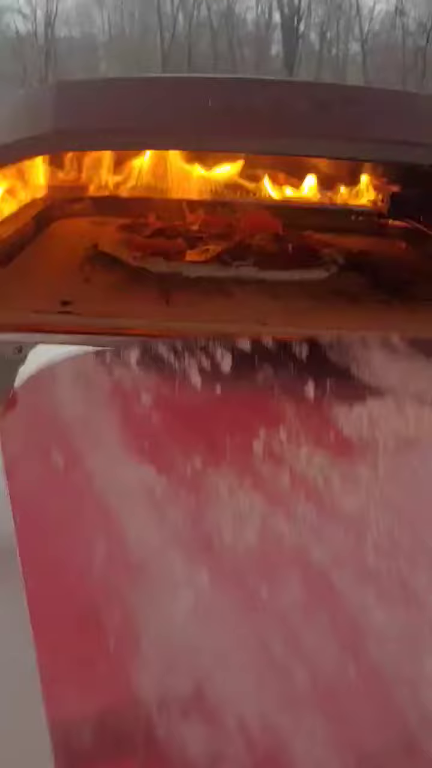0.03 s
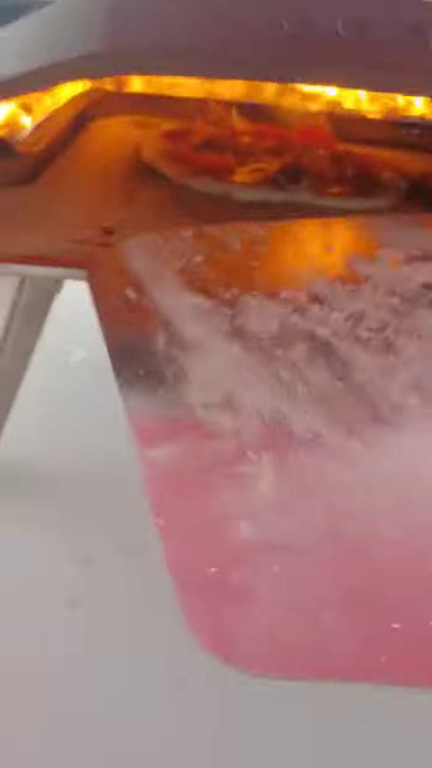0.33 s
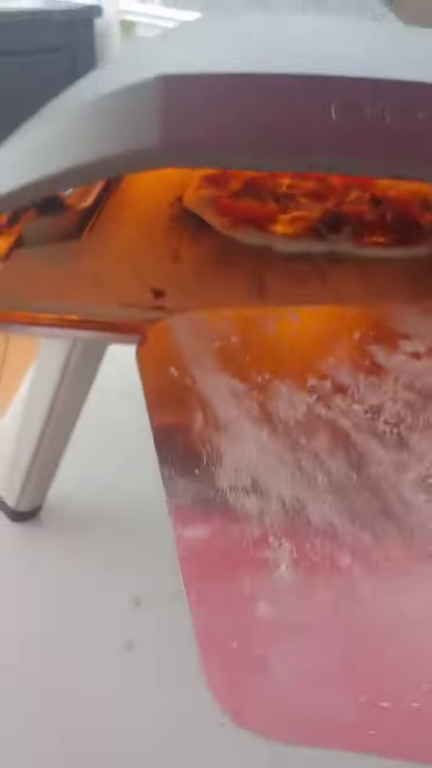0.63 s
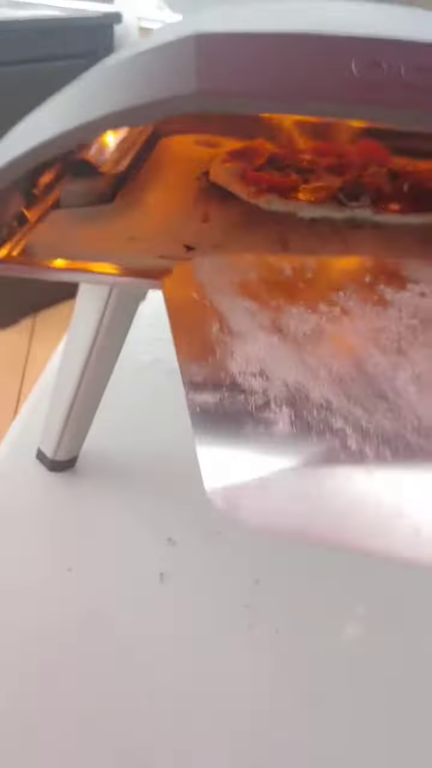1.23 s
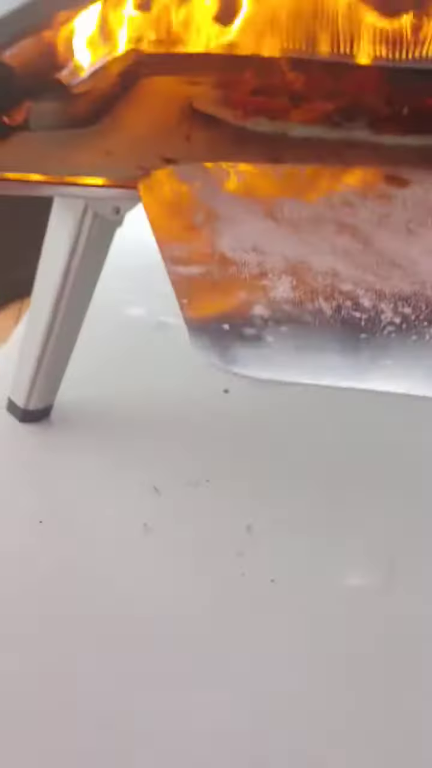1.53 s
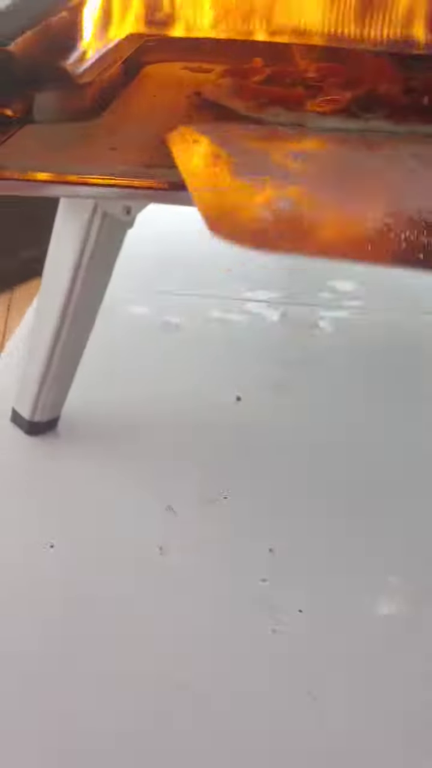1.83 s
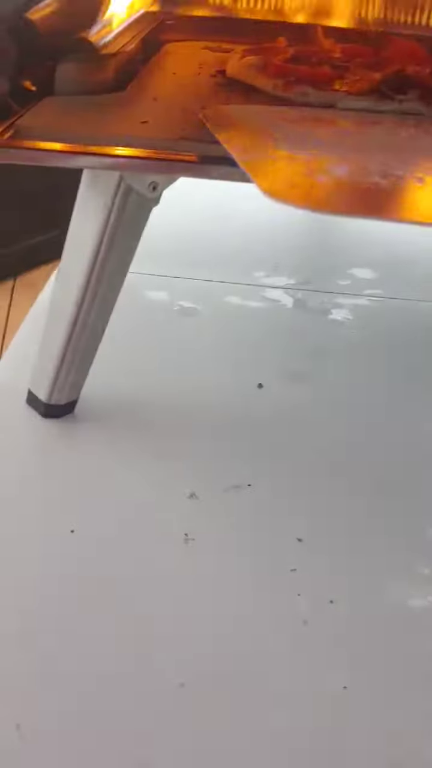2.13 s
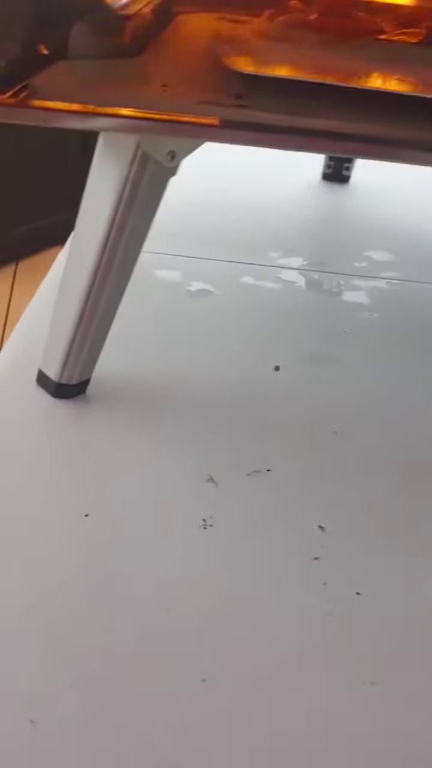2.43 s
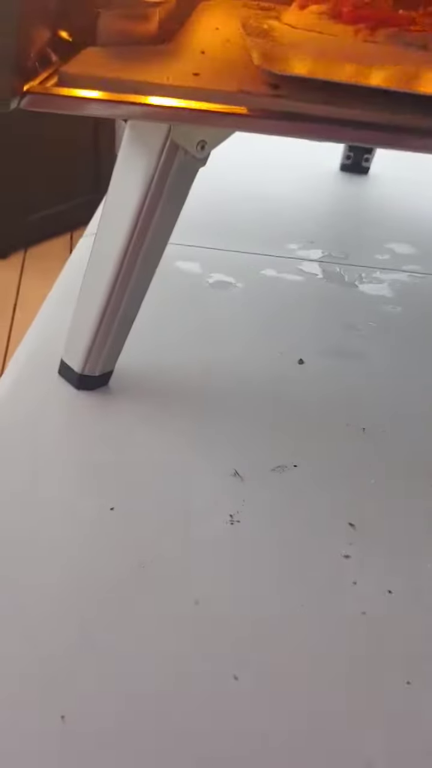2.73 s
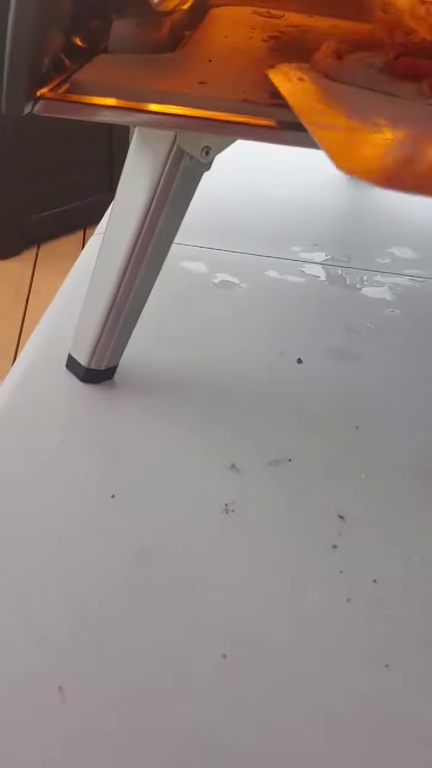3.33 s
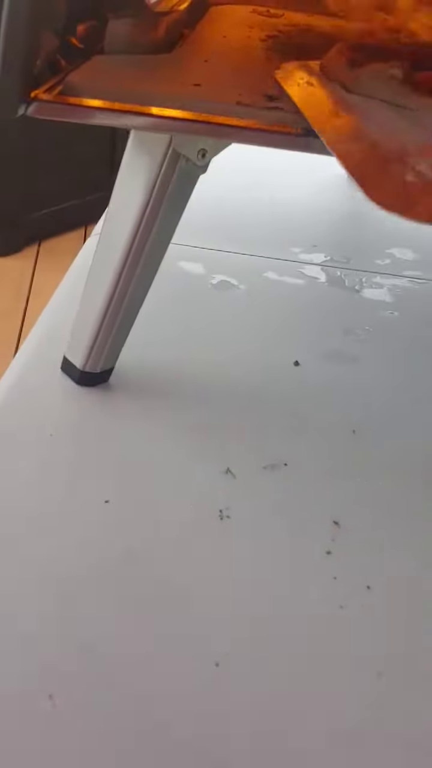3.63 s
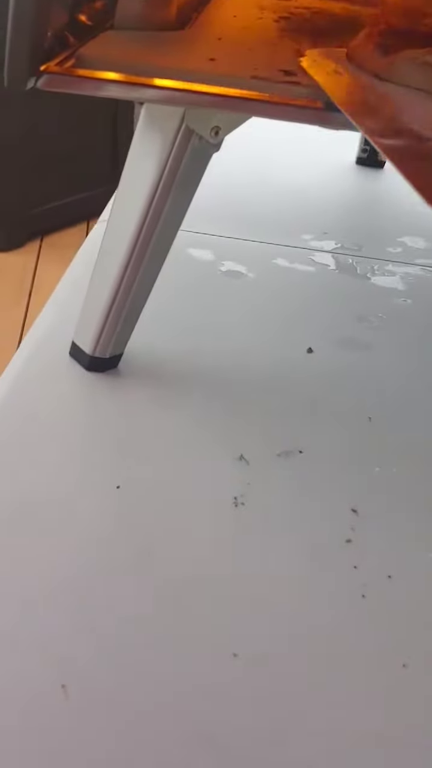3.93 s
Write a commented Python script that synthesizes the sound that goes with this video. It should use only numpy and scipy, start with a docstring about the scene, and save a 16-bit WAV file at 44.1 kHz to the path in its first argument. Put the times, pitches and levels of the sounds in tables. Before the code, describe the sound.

Short, raspy scrapes of a thin metal pizza peel on oven stone follow a ringing knock and a little wind on the nearby microphone. Crumbs snap and the blade rubs hollowly under dough, while the outdoor oven's flame rumbles throughout.

```python
"""A metal peel scrapes over the stone floor of an outdoor gas oven in short, gritty strokes.
Its edge sticks and slips, so the thin blade hisses, rumbles, rings and now and then squeals or honks.
It knocks on the oven mouth, snaps crumbs and drags hollowly under the dough. Underneath, the flame
roars and the oven cavity drones; light gusts touch the two ports of a hand-held microphone."""
import sys
import numpy as np
from scipy import signal
from scipy.fft import rfft, irfft
from scipy.io import wavfile

SR = 44100
rng = np.random.default_rng(int(sys.argv[2]) if len(sys.argv) > 2 else 0)


def int16_out(signal):
    """Quantize to a 16-bit WAV file."""
    q = np.round(np.clip(np.atleast_2d(signal).T, -1, 1) * 32767)
    wavfile.write(sys.argv[1], SR, q.astype(np.int16))


N = 176400
TIME = np.arange(N) / SR

# main modes of the peel's blade: f/Hz, relative level/dB, t60/s
BLADE_MODES = [(215, 1.5, 0.22), (278, -6, 0.18), (688.4, 5, 0.36), (787, -0.5, 0.4), (928, 9.5, 0.43),
               (1145, 1.5, 0.36), (1266, 2.5, 0.23), (1470, 3, 0.43), (1756, 5, 0.26), (1912, -1.5, 0.35),
               (2030, 5.5, 0.35), (2376, 1, 0.16), (2506, 2, 0.19), (3540, -1.5, 0.15), (4190, -9, 0.16),
               (5450, 2, 0.15), (5932, -9, 0.13), (6514, 4, 0.069)]


def amp(db):
    return 10 ** (np.asarray(db) / 20)


def unit_rms(x):
    return x / np.sqrt(np.mean(x ** 2) + 1e-20)


def unit_energy(x):
    return x / np.sqrt(np.sum(x ** 2, axis=-1, keepdims=True))


def at_hz(points, hz):
    """Reads a spectrum on a log-frequency axis."""
    f, value = np.transpose(points)
    return np.interp(np.log(hz + 1), np.log(f + 1), value)


def at_time(points):
    """Reads a curve at every sample."""
    return np.interp(TIME, *np.transpose(points))


def add(mix, start, sound):
    part = mix[:, max(round(start * SR), 0):][:, :sound.shape[-1]]
    part += sound[..., :part.shape[-1]]


def through(x, response):
    return signal.fftconvolve(np.atleast_2d(x), np.atleast_2d(response), axes=1)[:, :N]


def colour(points, size=4096):
    """Causal impulse response with the given spectrum."""
    log_gain = np.log(amp(at_hz(points, abs(np.fft.fftfreq(size, 1 / SR)))))
    return np.fft.ifft(np.exp(np.conj(signal.hilbert(log_gain)))).real[:size // 2]


def shape(x, points):
    """EQ that keeps the power of white noise."""
    return through(x, unit_energy(colour(points)))


def wander(hz):
    """Random drift of rms 1, rolling off above the given rate."""
    rolloff = 1 + (np.fft.rfftfreq(N, 1 / SR) / hz) ** 2
    return unit_rms(irfft(rfft(rng.standard_normal(N)) / rolloff, N))


def flame():
    """The gas flame's fluttering roar, nearly centred in the bass and wide in the treble."""
    spectrum = [(20, -8), (45, 3), (80, 0.5), (130, -2), (200, -4), (255, -4.5), (340, -3), (480, -6.5),
                (800, -4), (1500, -8.5), (2600, -16), (5000, -21), (9000, -50), (16000, -37)]  # roar: f/Hz, level/dB
    swell = [(0, -40), (.5, -36), (.9, -34.5), (1.5, -33.5), (2.6, -31.5), (3.4, -31.5), (4, -30)]  # louder as the microphone closes in: t/s, level/dB
    likeness = [(20, 0.21), (60, 0.78), (130, 0.91), (260, 0.89), (500, 0.42), (900, 0.017), (3000, -0.25),
                (16000, -0.17)]  # stereo image: f/Hz, left-right correlation
    same = at_hz(likeness, np.fft.rfftfreq(N, 1 / SR))
    left, other = rfft(rng.standard_normal((2, N)))
    noise = irfft(np.array([left, same * left + np.sqrt(1 - same ** 2) * other]), N)
    flutter_db = 1.08 * wander(hz=40.3)
    return unit_rms(through(noise, colour(spectrum))) * amp(at_time(swell) + flutter_db)


def cavity_drone():
    """The oven cavity hums on a wavering note and its octave."""
    swell = [(0, -91), (1.2, -44), (1.5, -42), (2.6, -35), (3.2, -35.5), (3.5, -36.5), (4, -42)]  # hum: t/s, level/dB
    pitch_hz = 100.1 + 5.29 * wander(hz=30.9)
    phase = 2 * np.pi * np.cumsum(pitch_hz) / SR
    fundamental = np.sin(phase) * (1 + 0.36 * wander(hz=27))
    octave = amp(-5.5) * np.sin(2 * phase) * (0.4 + wander(hz=20))
    return unit_rms(fundamental + octave) * amp(at_time(swell))


def low_drone():
    """A lower, unsteady cavity note that comes forward where the main one is weak."""
    swell = [(0, -65.5), (.8, -47.5), (1.3, -36), (1.6, -65), (3.0, -45), (3.5, -39), (4, -39.5)]  # low hum: t/s, level/dB
    pitch_hz = 78.1 + 6 * wander(hz=25)
    phase = 2 * np.pi * np.cumsum(pitch_hz) / SR
    return unit_rms(np.sin(phase) * (1 + 0.11 * wander(hz=11))) * amp(at_time(swell))


def wind():
    """Gusts buffet each microphone port with its own low rumble."""
    gusts = [(0.515, 0.16, -27, -53), (0.655, .11, -24.5, -49.5), (0.742, 0.15, -34, -40),
             (0.838, 0.11, -46, -27.5), (1.034, 0.064, -30, -42), (1.08, .13, -48, -28),
             (1.222, 0.06, -27, -16), (1.279, 0.1, -38, -22.5)]  # buffets: t/s, length/s, left level/dB, right level/dB
    spectrum = [(15, -15), (40, 0), (85, 0), (140, -15), (300, -37), (1000, -37), (16000, -90)]  # rumble: f/Hz, level/dB
    level = np.zeros((2, N))
    for start, length, left_db, right_db in gusts:
        arch = np.sin(np.pi * np.arange(0, 1, 1 / (length * SR)))
        add(level, start, amp([[left_db], [right_db]]) * arch)
    return level * unit_rms(through(rng.standard_normal((2, N)), colour(spectrum)))


def bumps():
    """The oven shudders dully on its stand."""
    shudders = [(.57, 203, -22.5, 0.049), (.645, 206, -28.5, 0.054), (.718, 296, -23, 0.017),
                (1.49, 170, -31.5, .12), (2.26, 286, -29, 0.037), (2.3, 171, -28, .055),
                (2.65, 192.3, -25, 0.068)]  # low thuds: t/s, f/Hz, level/dB, half-length/s
    out = np.zeros((2, N))
    for start, hz, db, half_length in shudders:
        age = np.arange(0, 2, 1 / (half_length * SR))
        turns = np.cumsum(hz * (1 + 0.12 * wander(hz / 2)[:len(age)])) / SR
        envelope = 8 * age * np.exp(-3 * age) * (1 - age / 2)
        add(out, start, amp(db) * envelope * np.sin(2 * np.pi * turns))
    return out


def shimmer(x, wet, count=5):
    """Blends in the dense, short ring of blade and oven, which shifts as the contact point moves."""
    decays = [(100, 0.24), (900, 0.076), (2500, 0.24), (6000, 0.085), (16000, 0.068)]  # dense modes: f/Hz, t60/s
    hz, t, noise = signal.stft(rng.standard_normal((count, 2, SR // 5)), SR, nperseg=256)
    tails = signal.istft(noise * 1000. ** (-t / at_hz(decays, hz)[:, None]), SR, nperseg=256)[1]
    shift_s, ring = 0.1982, 0
    for k, tail in enumerate(tails):
        crossfade = np.clip(1 - abs((TIME / shift_s - k) % count - 1), 0, 1)
        ring += through(x * np.sqrt(crossfade), unit_energy(tail))
    return np.sqrt(1 - wet) * x + np.sqrt(wet) * ring


def blade_notches(x):
    """The thin blade carves valleys between its resonances; they move as the peel slides in."""
    half_in = [(500, -5), (1070, -14), (1590, -1.5), (1980, -3), (2650, -17), (2930, -35), (3310, -16),
               (3800, -7), (4130, -6), (4690, -10), (5020, -8), (5290, -9), (5750, -23)]  # valleys with the peel half in: f/Hz, gain/dB
    fully_in = [(1060, -12), (1570, -5.5), (2450, -1), (2900, -11), (3220, -19), (4170, 0), (4600, 1),
                (5030, -6), (5230, -9), (5550, -11)]  # valleys with it fully in: f/Hz, gain/dB
    width_hz, makeup_db, slide_at_s, slide_s = 54.7, 1.1, 2.13, 0.17
    hz = np.fft.rfftfreq(4096, 1 / SR)
    depth = np.clip((TIME - slide_at_s) / slide_s + .5, 0, 1)
    out = 0
    for valleys, share in (half_in, 1 - depth), (fully_in, depth):
        gain_db = makeup_db + sum(db * np.exp(-((hz - f) / width_hz) ** 2) for f, db in valleys)
        out += share * through(x, colour(np.c_[hz, gain_db]))
    return out


def contacts(hits, decay_s):
    """A brief chatter of force for each hit."""
    out, t = np.zeros((2, N)), np.arange(SR // 20) / SR
    for start, db in hits:
        burst = rng.standard_normal((2, len(t))) * np.exp(-t / decay_s)
        add(out, start, amp(db) * unit_energy(burst))
    return out


def crumbs():
    """Crumbs snap under the edge and take the colour of the blade."""
    snaps = [(.3223, -5), (.6281, -7), (.9334, -8), (1.1735, 0.5), (1.651, -7), (2.256, 6), (2.317, 1),
             (2.6176, -0.5), (2.772, -3), (3.3609, -10), (3.5056, -6), (3.8777, 1), (3.9566, -5)]  # breaking crumbs: t/s, level/dB
    spectrum = [(200, -18), (1200, 10), (2500, 9.5), (5000, 13.5), (7000, 12), (12000, 5.5), (16000, -14)]  # bright tick: f/Hz, level/dB
    ticks = shape(contacts(snaps, decay_s=0.0033), spectrum)
    return amp(-1) * blade_notches(shimmer(ticks, wet=0.38))


def knock():
    """The peel lands on the oven mouth and bounces."""
    bounces = [(.502, 1.5), (.514, -1.5), (.523, -2), (.568, -7.5), (.594, -7), (.725, -13), (1.1, -9.5)]  # impacts: t/s, level/dB
    spectrum = [(60, -56), (210, 10), (330, 6), (480, 1), (800, -4), (1150, 2.5), (1700, -3.5),
                (2900, -10.5), (4000, -4), (5500, -15.5), (7000, -27), (16000, -47)]  # body of the knock: f/Hz, level/dB
    chatter = shape(contacts(bounces, decay_s=0.0078), spectrum)
    return amp(1) * shimmer(chatter, wet=0.54, count=2)


def blade_ring(rise_s, tilt_db=0, phase_spread=1):
    """The blade's decaying modes at each port, tilted by tilt_db per octave above a pivot."""
    t = np.arange(SR // 2) / SR
    pivot_hz, ring = 930, 0
    for hz, db, t60 in BLADE_MODES:
        envelope = amp(db + tilt_db * max(np.log2(hz / pivot_hz), 0) - 60 * t / t60)
        ring += envelope * np.sin(2 * np.pi * (hz * t + phase_spread * rng.random((2, 1))))
    return unit_energy(ring * np.minimum(t / rise_s, 1))


def clanks():
    """Firm blows set the whole blade ringing."""
    blows = [(.502, 6.5, -2, 0.0076), (.568, 2, -8, .014), (1.649, 1, 3, 0.0058), (2.3, 0.5, -3, 0.012)]  # strikes: t/s, level/dB, brightness/(dB per octave), rise/s
    out = np.zeros((2, N))
    for start, db, tilt_db, rise_s in blows:
        add(out, start, amp(db) * blade_ring(rise_s, tilt_db, phase_spread=0.5))
    return out


def honks():
    """The jammed blade swells on one mode and is damped at once."""
    jams = [(2.261, 922, -19.5), (2.3, 779, -24.5)]  # honking notes: t/s, f/Hz, level/dB
    out, t = np.zeros((2, N)), np.arange(SR // 8) / SR
    rise_s = 0.012
    envelope = (t / rise_s * np.exp(1 - t / rise_s)) ** 2
    for start, hz, db in jams:
        add(out, start, amp(db) * envelope * np.sin(2 * np.pi * hz * t))
    return out


def squeals():
    """The sticking edge sings in thin, fuzzy whistles."""
    whistles = [(1.678, 0.17, 6210, -29), (2.235, 0.045, 6500, -40), (3.34, 0.15, 6530, -35)]  # narrow noise bands: t/s, length/s, f/Hz, level/dB
    out = np.zeros((2, N))
    for start, length, hz, db in whistles:
        t = np.arange(0, length, 1 / SR)
        fuzz = (wander(hz=55) + 1j * wander(hz=55))[:len(t)]
        whistle = unit_rms((fuzz * np.exp(2j * np.pi * hz * t)).real)
        add(out, start, amp(db) * np.sin(np.pi * t / length) * whistle)
    return out


def grit():
    """Dense tiny slips of uneven size, clumped by the judder of the blade."""
    slips_per_s, spread_db, judder_db = 12000, 2, 0.86
    size = amp(spread_db * np.minimum(rng.exponential(1, (2, N)), 5))
    slips = size * rng.choice([-1, 1], (2, N)) * (rng.random(N) < slips_per_s / SR)
    return unit_rms(slips * amp(judder_db * wander(hz=70)))


def dough_drag():
    """The blade wedges under the dough with a muffled, hollow rub."""
    swell = [(2.95, -60), (3.18, -35), (3.34, -29), (3.42, -33.5), (3.55, -37), (3.7, -60)]  # rubbing: t/s, level/dB
    hollow = [(100, -55), (400, -1.5), (650, 2), (920, 3.5), (1300, -4), (2000, -11), (3000, -29),
              (16000, -55)]  # muffled tone: f/Hz, level/dB
    return shape(grit() * amp(at_time(swell)), hollow)


def stick_slip():
    """Rasp envelope: the edge sticks and slips in a quick, uneven train, with a few hard catches."""
    catches = [(1.6545, -1.5), (1.716, -1), (1.7265, -3), (1.736, 4), (1.81, 8), (2.2114, 9), (2.257, 5),
               (2.2595, -0.5), (2.2795, 1), (2.285, -1), (2.3163, 7.5)]  # snags within a push: t/s, gain/dB
    slips_per_s, jitter, decay_s, spread_db = 240, 0.35, 0.0019, 1.5
    depth, catch_s = 0.63, 0.0038
    turns = np.cumsum(slips_per_s * np.exp(jitter * wander(slips_per_s))) / SR
    size = amp(spread_db * rng.standard_normal(N))[turns.astype(int)]
    slips = size * np.exp(-(turns % 1) / (slips_per_s * decay_s))
    catch_db = sum(db * np.exp(-(2 * (TIME - start) / catch_s - 1) ** 2) for start, db in catches)
    return unit_rms(1 - depth + depth * unit_rms(slips)) * amp(catch_db)


def at_ports(pair, lag_s=0.00032, share=0.53):
    """The right port hears the left port's grit a little later, mixed with grit of its own."""
    left, own = pair
    delayed = np.roll(left, round(lag_s * SR))
    return np.array([left, np.sqrt(share) * delayed + np.sqrt(1 - share) * own])


def scrape():
    """Each push drags the blade over grit: a hiss, then a rumble and ring as it bears down."""
    # pushes of the peel: t/s, rise/s, hold/s, half-release/s, hiss level/dB, rumble level/dB
    strokes = [(0.624, 0.013, 0.024, .04, -40.5, -38.5), (1.133, 0.12, 0.087, 0.074, -32.5, -37),
               (1.409, 0.028, 0.0045, 0.048, -31.5, -32.5), (1.462, 0.027, 0.053, 0.077, -31, -39.5),
               (1.645, 0.0064, 0.0077, 0.015, -23, -29), (1.649, 0.059, 0.12, 0.071, -19.5, -30.5),
               (1.898, 0.056, 0.072, 0.074, -28, -36), (2.107, 0.051, 0.02, 0.083, -33.5, -40),
               (2.204, 0.039, 0.035, 0.062, -18, -27.5), (2.275, 0.029, 0.077, 0.25, -28.5, -44),
               (3.15, 0.24, 0.025, 0.026, -29.5, -41), (3.456, 0.03, .005, 0.12, -24.5, -40),
               (3.922, 0.032, .005, 0.068, -32, -36)]
    slide = [(1.1, -48), (1.3, -46.5), (2.1, -44), (2.55, -41), (3.1, -35.5), (3.6, -37), (3.8, -37.5),
             (4.0, -45)]  # light, steady rubbing: t/s, level/dB
    hiss_spectrum = [(200, -12), (1000, -15), (1850, -1.5), (2450, -5), (2900, -7), (3500, -3.5),
                     (5200, -0.5), (6500, 0.5), (9000, -1), (12300, -5.5), (16000, -12)]  # edge on stone: f/Hz, level/dB
    rumble_spectrum = [(60, -22), (170, -9.5), (300, -2), (480, -8.5), (760, 1), (950, -3.5), (1080, -11),
                       (1300, -2.5), (1900, -0.5), (2500, -14.5), (2900, -7), (3500, -16), (6000, -24),
                       (16000, -35)]  # body of the blade: f/Hz, level/dB
    rumble_lag_s, slide_rumble_db = 0.025, -7
    hiss_power = amp(at_time(slide)) ** 2
    press = hiss_power * amp(slide_rumble_db) ** 2
    for start, rise, hold, half_release, hiss_db, rumble_db in strokes:
        age = TIME - start
        ramp = np.clip(np.minimum(age / rise, 1 - (age - rise - hold) / (2 * half_release)), 0, 1)
        push = ramp ** np.where(age < rise, 1.4, 3.5)
        hiss_power += (amp(hiss_db) * push) ** 2
        press += (amp(rumble_db) * np.interp(TIME - rumble_lag_s, TIME, push)) ** 2
    rasp = stick_slip()
    force = at_ports(grit() * rasp * np.sqrt(press))
    friction = at_ports(grit() * rasp * np.sqrt(hiss_power))
    rub = amp(2) * shape(friction, hiss_spectrum) + shape(force, rumble_spectrum)
    ring_share = (press / press.max()) ** 0.065  # harder pushes ring more
    ring = amp(-0.5) * through(force * ring_share, blade_ring(rise_s=0.0065))
    return blade_notches(shimmer(rub, wet=0.63)) + ring


def scene():
    peel = scrape() + squeals() + honks() + dough_drag() + knock() + clanks() + crumbs()
    return peel + bumps() + flame() + cavity_drone() + low_drone() + wind()


def record(dry):
    """The microphone opens and fades up; its ports colour the sound and the top treble is cut."""
    left_port = [(20, -3.5), (1500, 1.5), (3900, 2), (5400, 0), (6050, 5), (6550, 12.5), (7080, 3),
                 (7500, -22.5), (7950, -12), (8700, -4), (10200, -1.5), (12350, -5), (12600, -15.5),
                 (16000, -20.5)]  # left response: f/Hz, gain/dB
    right_port = [(20, -4.5), (1500, 1.5), (4000, -2), (5200, 1), (5900, -1.5), (6700, -9.5), (7100, -22),
                  (7800, -20.5), (8400, -11.5), (10500, -10), (12350, -5.5), (12600, -11), (16000, -62)]  # right response: f/Hz, gain/dB
    open_s, fade_from_db, fade_s, cutoff_hz = 0.14, -10, 0.27, 15800
    t = TIME - open_s
    fade = (t > 0) * amp(fade_from_db * np.clip(1 - t / fade_s, 0, 1))
    heard = through(dry, [colour(left_port), colour(right_port)]) * fade
    lowpass = signal.firwin(511, cutoff_hz, window=("kaiser", 9), fs=SR)
    return signal.oaconvolve(heard, lowpass[None], "same")


dry = scene()
out = record(dry)
int16_out(out)
```